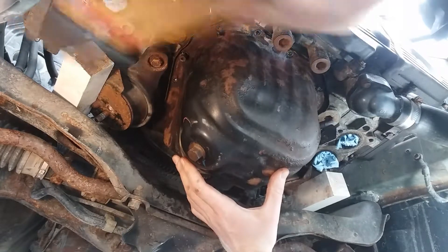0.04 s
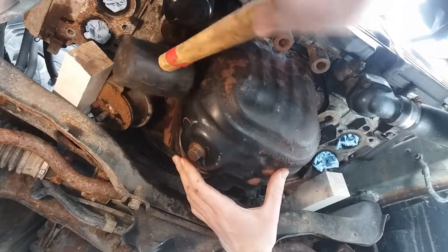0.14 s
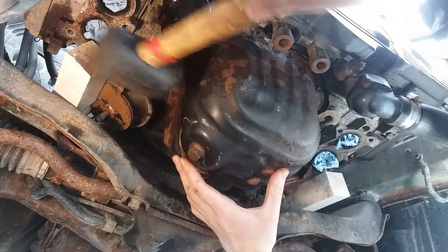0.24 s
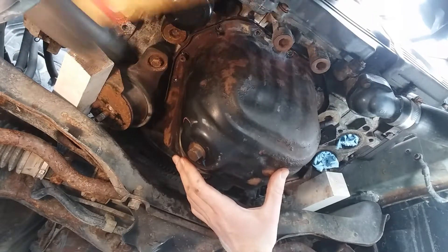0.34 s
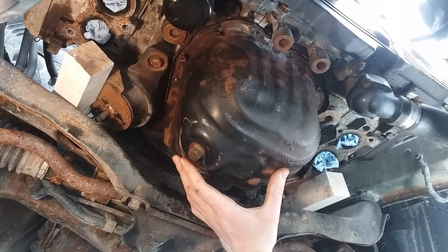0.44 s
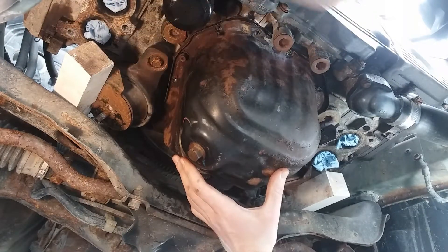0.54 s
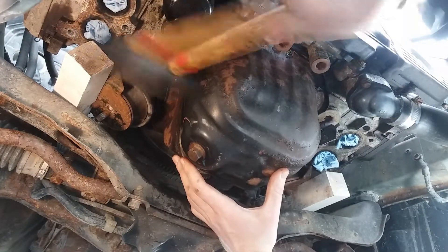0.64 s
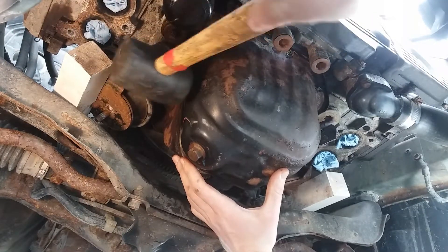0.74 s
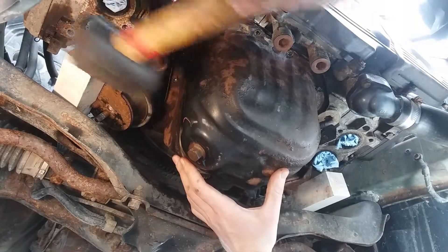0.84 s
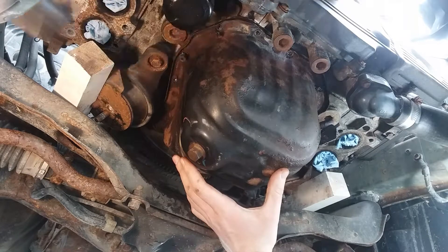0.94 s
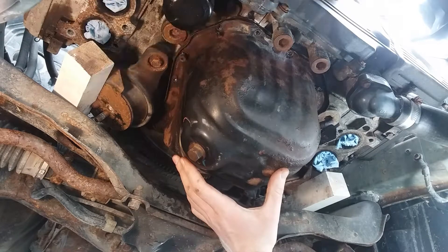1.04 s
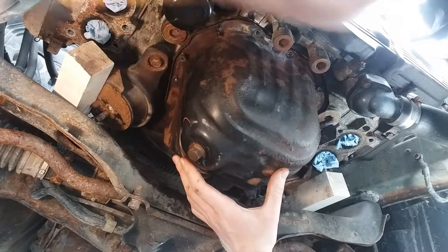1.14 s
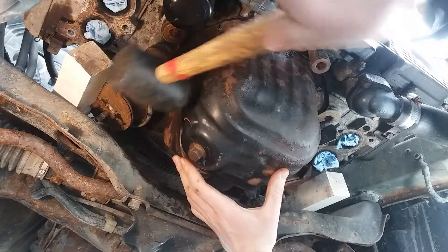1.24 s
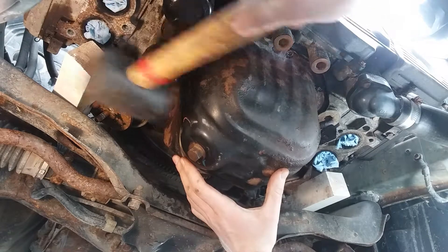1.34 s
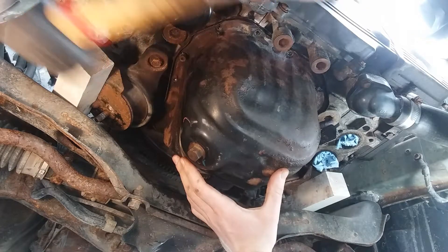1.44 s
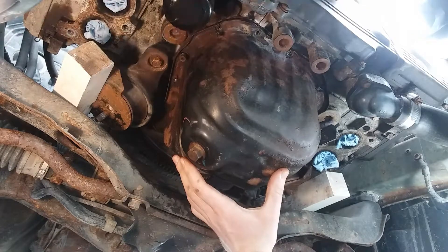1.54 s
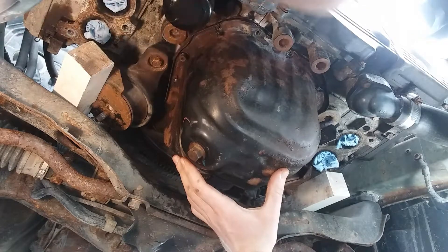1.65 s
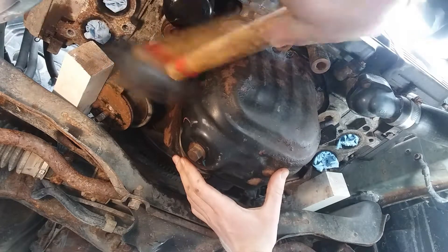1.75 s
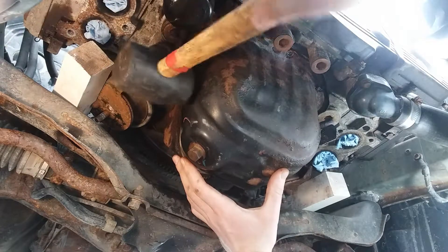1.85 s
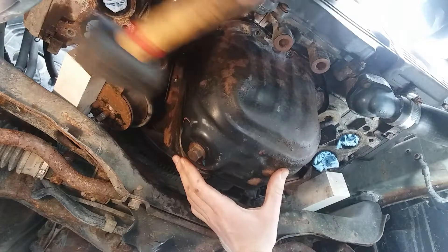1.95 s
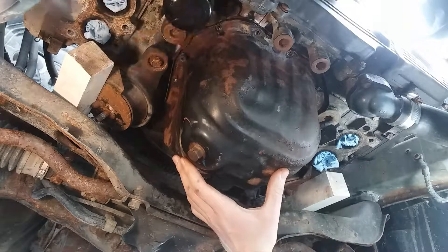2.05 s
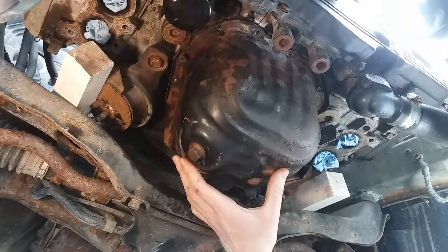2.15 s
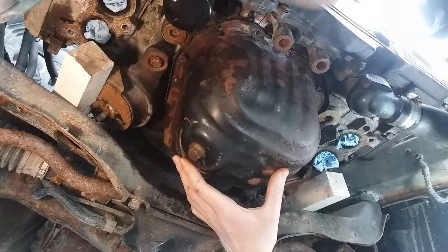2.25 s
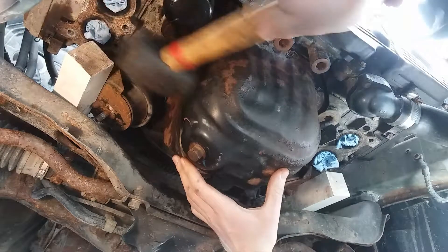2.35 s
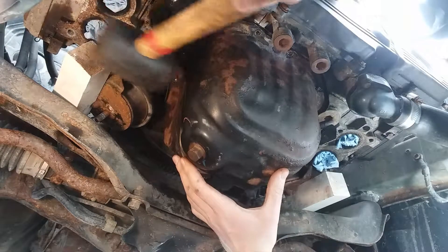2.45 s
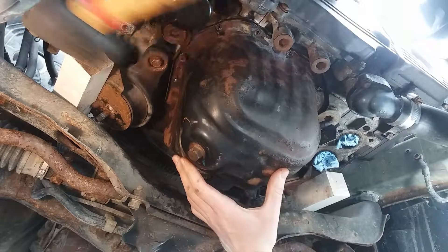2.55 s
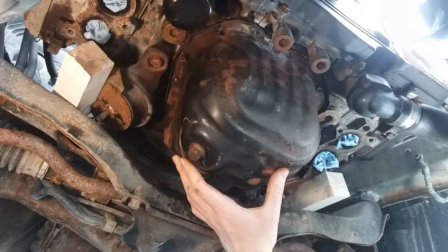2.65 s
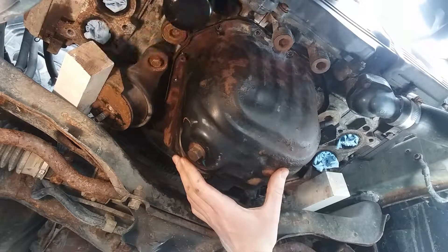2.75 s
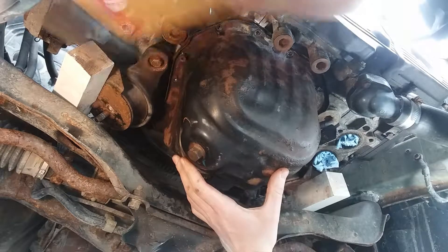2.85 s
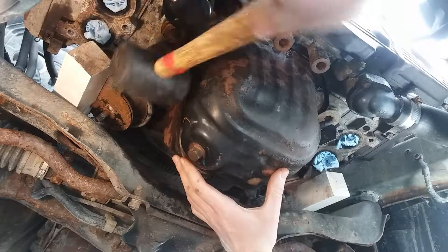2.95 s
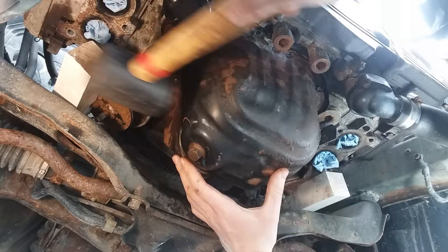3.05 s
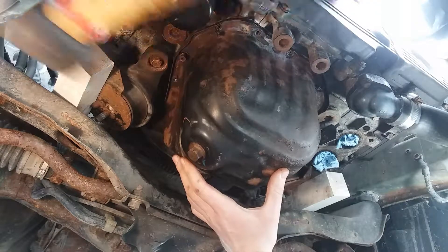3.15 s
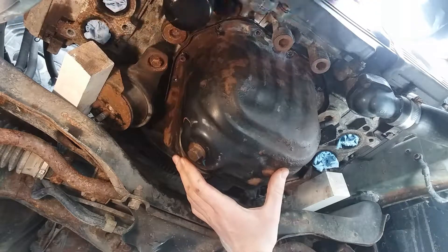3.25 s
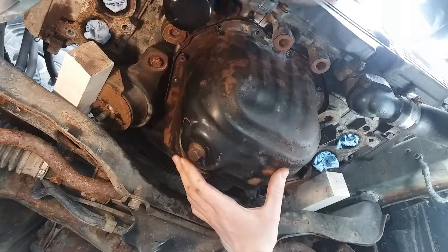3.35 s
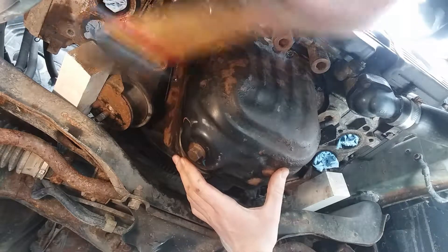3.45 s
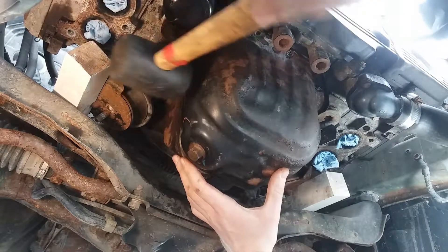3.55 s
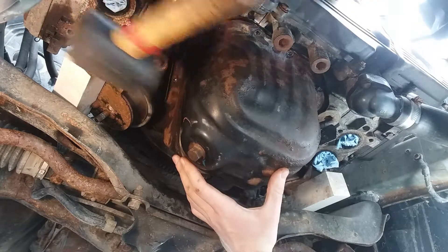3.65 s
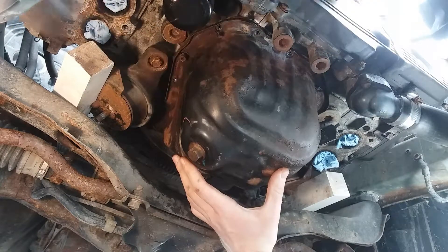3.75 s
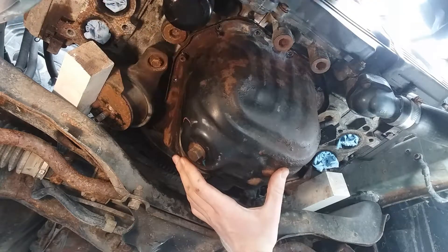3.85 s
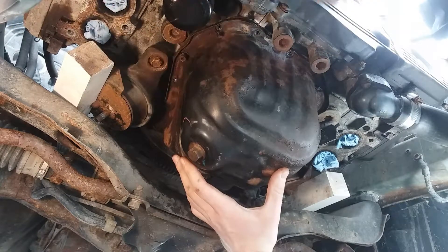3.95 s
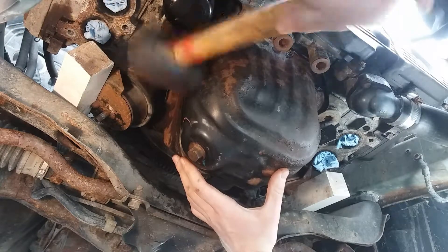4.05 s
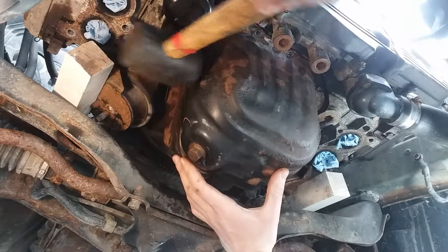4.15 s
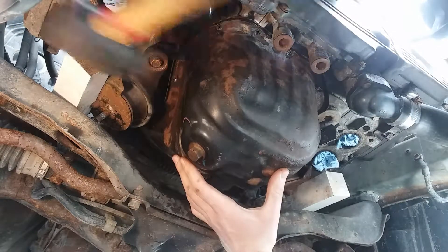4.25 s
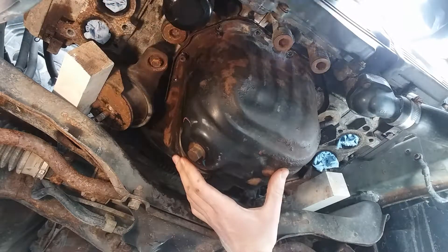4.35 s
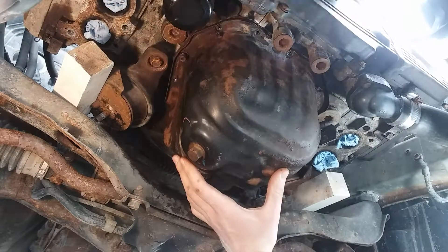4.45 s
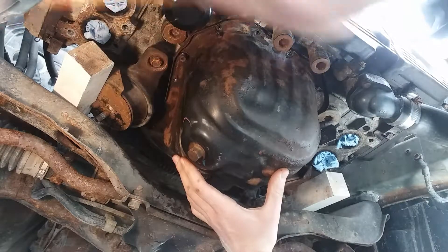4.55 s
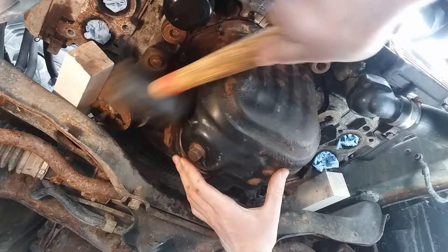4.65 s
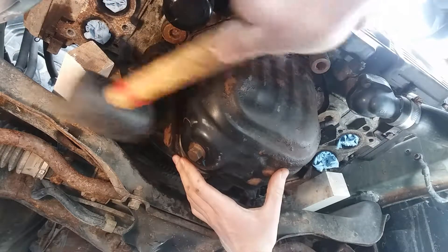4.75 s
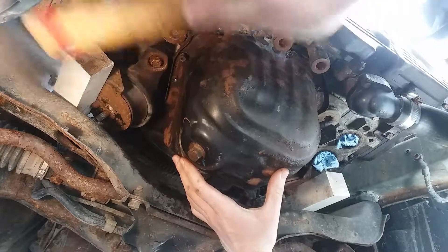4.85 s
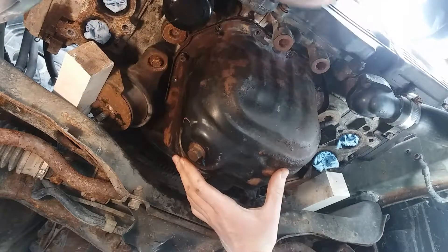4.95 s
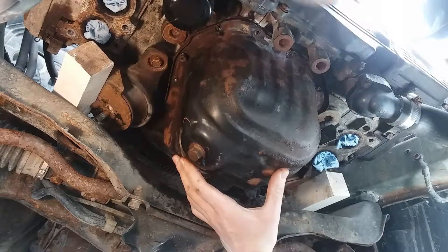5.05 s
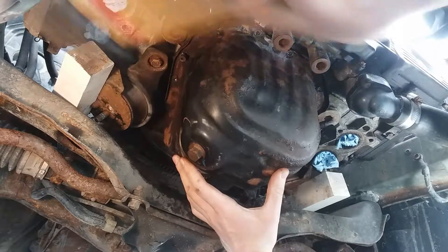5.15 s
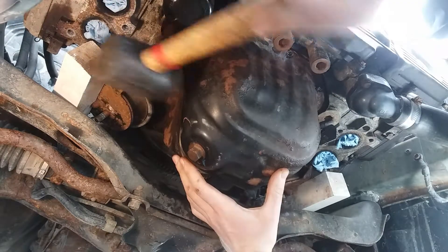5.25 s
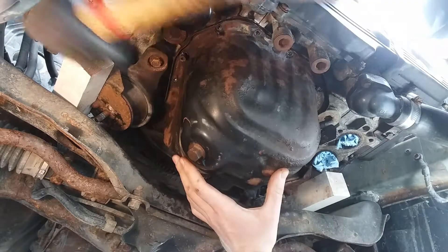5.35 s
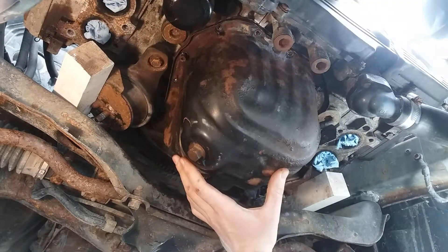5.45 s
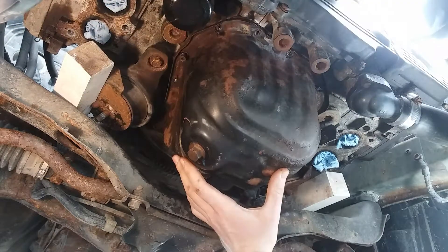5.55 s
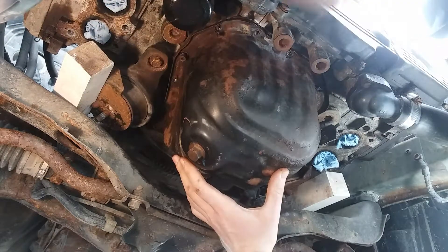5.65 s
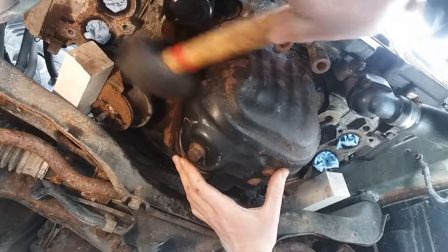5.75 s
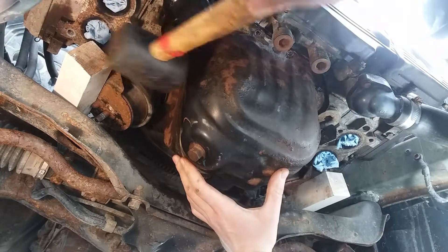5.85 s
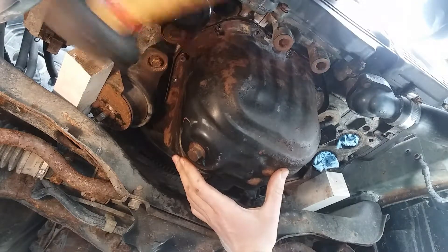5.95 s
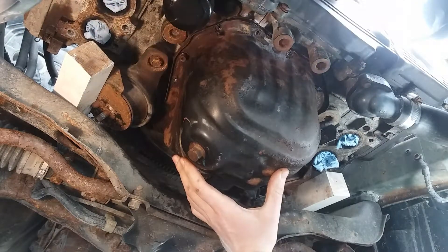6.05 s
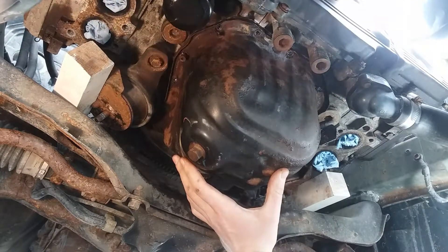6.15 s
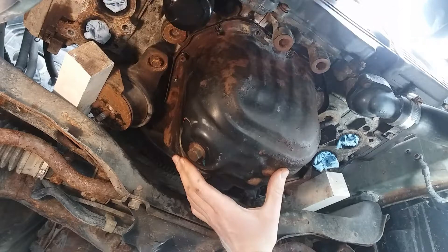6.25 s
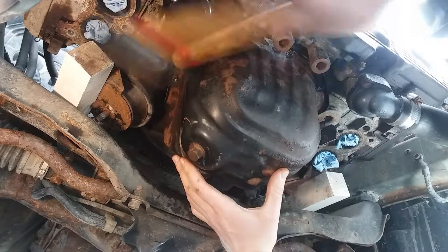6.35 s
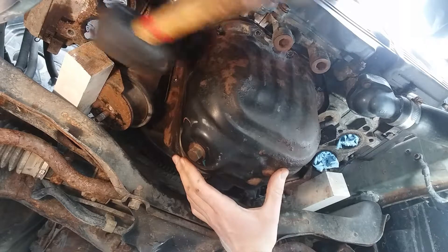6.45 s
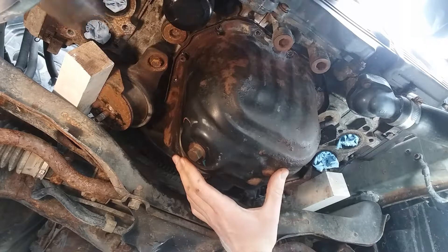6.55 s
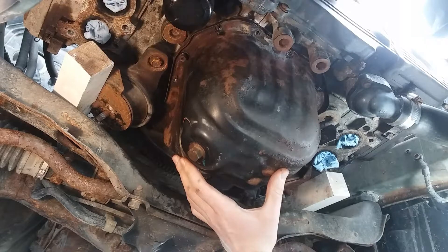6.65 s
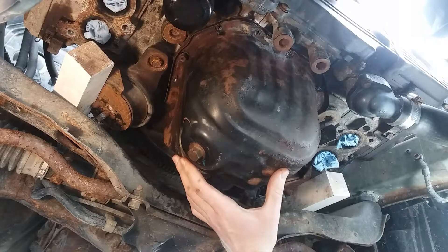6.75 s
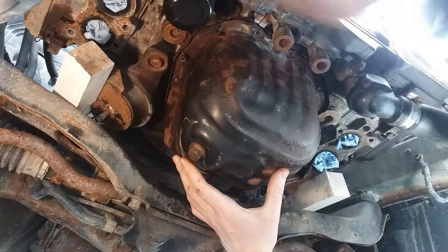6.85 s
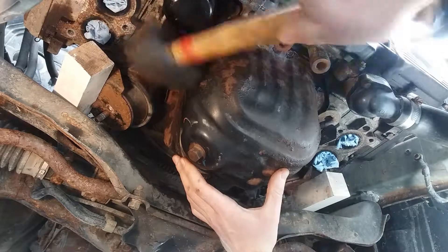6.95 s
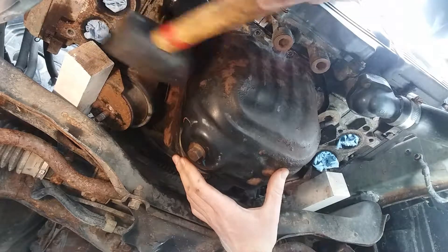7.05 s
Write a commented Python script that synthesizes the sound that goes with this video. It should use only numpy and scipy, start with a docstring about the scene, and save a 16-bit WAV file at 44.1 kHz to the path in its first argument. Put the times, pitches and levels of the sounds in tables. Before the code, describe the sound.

Under a car in a home garage, a rubber mallet strikes a steel oil pan thirteen times, a little under two blows a second. Each is a loud, hollow, mid-pitched clonk with dry rusty clatter and tight reflections, gone quickly. Between blows there are very faint sleeve rustles, small ticks and a little low air buffeting. The close stereo microphone hears almost no room tail.

```python
"""Rubber mallet on an oil pan

Under a car in a home garage a rubber mallet knocks thirteen times on a steel oil pan, steadied by a hand.
Each knock is a set of fading sine tones, hollow near 700 Hz, with echoes from floor and underbody;
bands of noise add the rusty clatter. Shaped noise also makes the sleeve's rustle, light ticks and scuffs
of handling, a dull puff, air buffeting the close microphone, and a hiss and a broad rush that swell at
the end. A limiter holds down the highest peaks."""
import sys
import numpy as np
from scipy import signal
from scipy.io import wavfile
from scipy.ndimage import uniform_filter1d, minimum_filter1d

SR = 44100
rng = np.random.default_rng(int(sys.argv[2]) if len(sys.argv) > 2 else 0)


def log_audio(samples):
    """Write samples as a 16-bit WAV file to the path given in sys.argv[1]."""
    # one column per channel
    frames = np.atleast_2d(samples).T
    # limit to full scale, then quantise
    limited = np.clip(frames, -1, 1)
    pcm = np.round(limited * 32767).astype(np.int16)
    wavfile.write(sys.argv[1], SR, pcm)


N = 313110
TIME = np.arange(N) / SR  # the whole scene [s]
AGE = np.arange(int(.45 * SR)) / SR  # time since one short sound began [s]
EDGES = 25 * 2 ** (np.arange(25) * .39)  # edges of the noise bands [Hz]


def from_db(db):
    """Turn decibels into a gain."""
    return 10 ** (np.asarray(db) / 20)


def rms_one(x):
    """Scale a sound to an average power of 1."""
    return x / np.sqrt(np.mean(x ** 2) + 1e-20)


def in_time(rows):
    """Draw straight lines through (time, level) points, giving a level at every sample."""
    times, levels = np.transpose(rows)
    return np.interp(TIME, times, levels)


def at_hz(rows, hz):
    """Read every column of a spectrum table at one frequency, spacing pitches as the ear does."""
    table_hz, *columns = np.transpose(rows)
    return [np.interp(np.log(hz), np.log(table_hz), column) for column in columns]


def pan(db):
    """Left and right gains that make the left side louder than the right by this many dB."""
    return from_db(np.array([[db], [-db]]) / 2)


def dying(t60, rise_s):
    """Loudness shape that builds up quickly, then fades at 60 dB per t60 seconds."""
    return np.exp(-np.log(1000) * AGE / t60) * (1 - np.exp(-AGE / rise_s))


def add(out, start_s, sound):
    """Mix a sound in at a given time."""
    start = int(start_s * SR)
    out[:, start:start + sound.shape[-1]] += sound[:, :N - start]


def drift(per_s):
    """Slow random wander: random points joined by lines, with a spread of 1."""
    knots = np.arange(0, N / SR + 1, 1 / per_s)
    return rms_one(np.interp(TIME, knots, rng.standard_normal(len(knots))))


def swells(rows):
    """Gain of short bell-shaped swells, added together."""
    return sum(from_db(db) * np.exp(-.5 * ((TIME - s) / length) ** 2) for s, db, length in rows)


# how alike the left and right noise are: (frequency [Hz], correlation [-1 to 1])
LIKENESS = [(60, 0.1), (150, 0.87), (300, 0.61), (700, 0), (1400, 0), (4000, 0.0022), (12000, 0.085)]


def noise_bands(shape):
    """Yield (centre Hz, band of stereo noise), mixing a shared and an opposed noise for the likeness."""
    white = rng.standard_normal((2, 2) + shape)
    for k, (low, high) in enumerate(zip(EDGES, EDGES[1:])):
        hz = np.sqrt(low * high)
        band = signal.butter(2, [low, high], "band", fs=SR, output="sos")
        mid, side = signal.sosfilt(band, white[k % 2])  # neighbouring bands use different noise
        alike = np.clip(at_hz(LIKENESS, hz)[0], -1, 1)
        mid = np.sqrt(1 + alike) * mid
        side = np.sqrt(1 - alike) * side
        yield hz, np.stack([mid + side, mid - side], axis=-2)


# draught on the microphone, relative: (time [s], level [dB])
RUMBLE = [(0.01, -49.5), (2.81, -58), (3.77, -53.5), (3.95, -45), (4.33, -51), (4.69, -36), (5.01, -33),
          (5.09, -42.0), (5.53, -40.5), (5.77, -50.5), (6.23, -69.5), (6.93, -53.5)]
# its strongest gusts: (time [s], level [dB], length [s])
GUSTS = [(4.612, -33.5, 0.012), (4.72, -40, 0.032), (4.845, -29.5, 0.018), (4.98, -41.5, 0.026),
         (5.553, -44, 0.0053)]


def draught(rumble, gust):
    """Moving air buffets the microphone: a lumpy low rumble with short stronger gusts."""
    lumps = from_db(2.2 * drift(per_s=35))
    return rumble * from_db(in_time(RUMBLE) - 2.6) * lumps + gust * swells(GUSTS)


# soft background rush, relative: (time [s], level [dB])
RUSH = [(0.01, -56.5), (0.97, -50.5), (1.19, -55), (2.91, -66.5), (3.21, -56.5), (3.29, -62.5),
        (5.25, -58.5), (5.57, -55), (5.71, -58.5), (5.79, -48.5), (6.27, -60.5), (6.82, -43)]


def soft_rush(rush):
    """A broad noise follows a slow level curve and swells at the end."""
    return rush * from_db(in_time(RUSH) - 1.92)


# hiss above the rush, relative: (time [s], level [dB])
HISS = [(0.01, -71), (1.27, -65), (2.31, -75), (2.39, -66), (2.85, -81.5), (3.51, -57.5), (3.85, -69),
        (4.43, -68), (4.69, -61.5), (5.25, -67), (5.67, -61.5), (5.79, -62.5), (6.37, -69), (6.82, -47.0)]


def soft_hiss(hiss, grain):
    """A grainy high noise follows its own level curve."""
    return hiss * from_db(in_time(HISS) - 4.1) * grain


def strokes():
    """Gain of the sleeve: one swell on the swing before a blow and a softer one on the lift after it."""
    swing_lead_s, swing_s = 0.078, 0.063
    lift_lag_s, lift_s, lift_db = 0.23, 0.076, -1.5
    swings = [(s - swing_lead_s, db, swing_s) for s, *_, db in BLOWS]
    lifts = [(s + lift_lag_s, db + lift_db, lift_s) for s, *_, db in BLOWS]
    return swells(swings + lifts)


def sleeve_rustle(hiss, rustle, grain):
    """Cloth catches and slips as the arm moves, so the high noise flutters."""
    motion = strokes() * from_db(2.8 * drift(per_s=59))
    return (from_db(-5.5) * hiss + rustle * pan(db=10.0)) * motion * grain


# the steadying hand scuffs on the steel, relative: (time [s], level [dB], length [s])
SCUFFS = [(0.615, -63.5, 0.06), (4.555, -57, 0.023)]


def hand_scuffs(hiss, rush, grain):
    """Skin rubbing on steel: brief swells of hiss and rush."""
    return (hiss + from_db(-2.5) * rush) * grain * swells(SCUFFS)


# spectra of the five noises, relative: (frequency [Hz], level per Hz [dB])
RUMBLE_COLOUR = [(15, -55), (25, -28), (61, -3.5), (107, 3), (152, 2.5), (261, -8.5), (361, -19.5),
                 (500, -20.5), (650, -52.5), (1100, -120)]
GUST_COLOUR = [(15, -50), (25, -41), (59, 1.5), (173, -2.5), (285, 3), (408, -10), (446, -7.5), (661, -22),
               (1800, -44), (2340, -67.5), (3960, -120)]
RUSH_COLOUR = [(150, -26), (250, 0), (454, -0.5), (558, 4), (1150, -4), (1530, -8.5), (2600, -25.5),
               (3380, -51.5), (5720, -120)]
HISS_COLOUR = [(1000, -30), (1700, -1), (2360, -6), (2820, -2), (4380, -4.5), (6150, -18.5), (9370, -31.5),
               (12500, -22.5), (16000, -38.5)]
RUSTLE_COLOUR = [(3000, -6), (7000, 0.5), (9500, -8), (12500, 4.5), (16000, -1)]


def air():
    """Colour one noise in five ways, then play draught, rush, hiss, sleeve and scuffs with it."""
    colours = [RUMBLE_COLOUR, GUST_COLOUR, RUSH_COLOUR, HISS_COLOUR, RUSTLE_COLOUR]
    layers = np.zeros((len(colours), 2, N))
    for hz, noise in noise_bands((N,)):
        for layer, colour in zip(layers, colours):
            if colour[0][0] <= hz <= colour[-1][0]:
                layer += from_db(at_hz(colour, hz)[0]) * noise
    rumble, gust, rush, hiss, rustle = map(rms_one, layers)
    grain = from_db(0.87 * drift(per_s=16) + 1.3 * drift(per_s=200))
    background = draught(rumble, gust) + soft_rush(rush) + soft_hiss(hiss, grain)
    return background + sleeve_rustle(hiss, rustle, grain) + hand_scuffs(hiss, rush, grain)


def ring(modes, rise_s, left_lead_s, scatter_db, detune):
    """One blow on a set of modes; each landing spot shares the force out a little differently."""
    out = 0
    pitch = 1 + detune * rng.standard_normal()
    for hz, db, t60, side_db in modes:
        wave = np.sin(2 * np.pi * hz * pitch * (AGE + np.array([[left_lead_s], [0]])))
        gain = from_db(db + scatter_db * rng.standard_normal())
        out = out + gain * pan(side_db) * wave * dying(t60, rise_s)
    return out


# dense clatter of sheet and rust, relative: (frequency [Hz], level per Hz [dB], left over right [dB])
CLATTER = [(40, -22, 5.5), (85, -1, 0.5), (170, -3, -0.5), (350, -5, -4.5), (700, -4.5, -1.5),
           (1030, -10, 7.5), (1590, -4, 2.5), (2800, -8.5, -2), (4180, -9.5, -5), (5180, -14, 3),
           (7150, -20, 11.5), (8900, -35, 11.5), (13200, -17.5, 10.5), (17300, -25.5, 14)]
# how long the clatter lasts: (frequency [Hz], time to fade by 60 dB [s])
CLATTER_T60 = [(100, .16), (350, .11), (1000, .125), (2500, .11), (5000, .097), (9000, .08), (16000, .072)]


def clatter(level_db, fresh, hold_s, rise_s, room_db, room_t60):
    """Countless close modes, partly the same at each blow; they rattle while the rubber presses, then die."""
    _, _, clatter_db, thud_db, _ = np.transpose(BLOWS)[:, :, None, None]
    tilt_db_per_octave = -1.73
    out = 0
    for hz, noise in noise_bands((len(BLOWS) + 1, len(AGE) * 3 // 2)):
        noise = noise[..., -len(AGE):]  # skip the start, where the filters are still settling
        db, side_db = at_hz(CLATTER, hz)
        t60, = at_hz(CLATTER_T60, hz)
        # the first noise is common to all blows, the others are new for each blow
        grain = np.sqrt(1 - fresh) * noise[0] + np.sqrt(fresh) * noise[1:]
        colour_db = thud_db if hz < 250 else clatter_db + tilt_db_per_octave * np.log2(hz / 1000)
        fade = np.exp(-np.log(1000) * np.maximum(AGE - hold_s, 0) / t60)
        envelope = fade * (1 - np.exp(-AGE / rise_s))
        garage_tail = from_db(room_db) * dying(room_t60, rise_s=.02) / (1 + hz / 4000)  # faint and dull
        gain = from_db(level_db + db + colour_db) * pan(side_db)
        out = out + gain * grain * (envelope + garage_tail)
    return out


# mallet blows, relative levels:
# (time [s], force [dB], clatter [dB], low thud [dB], sleeve rustle [dB])
BLOWS = [(0.1816, 0, 2, -1, -100), (0.7521, 0.5, 2.5, -1.5, -72), (1.3138, 0.5, 3, 0, -78),
         (1.85, -.5, 3, 2.5, -74.5), (2.4363, 0, 3, -3, -87.5), (2.9912, 0, 1.5, -1, -89.5),
         (3.574, -1, 2.5, 0, -78), (4.1469, -1, 1, 3.5, -72), (4.7304, -1, 3.5, 1, -72.5),
         (5.2928, -.5, 3, 1, -77.5), (5.846, 0.5, 0, -5, -68.5), (6.4336, -0.5, -1, -15.5, -79.5),
         (6.9819, 2.5, -0.5, -10, -100)]
# hollow modes of the pan's belly, relative:
# (frequency [Hz], level [dB], time to fade by 60 dB [s], left over right [dB])
BELLY = [(496, -29, .18, -5), (539.4, -11.3, .124, -2), (583, -16, .065, -.6), (675, -20, .086, -.5),
         (693, -7.2, .18, 1), (729.7, -2, .042, -.7), (764, -16, .12, -6), (822.6, -33, .17, 2)]
# modes of its walls and flange, relative:
# (frequency [Hz], level [dB], time to fade by 60 dB [s], left over right [dB])
WALLS = [(70, -40, .14, 6), (118, -35, .2, -2), (150, -37, .2, 1), (207, -30, .09, 0), (288, -21, .08, -4),
         (326, -27, .1, -3), (374, -21, .08, -1), (420, -27, .06, -2), (932, -25, .11, 0),
         (1092, -32, .1, 3), (1125, -32, .1, 4), (1213, -24, .15, 4), (1325, -27, .1, 1),
         (1366, -23, .12, -3), (1504, -24, .13, -1), (1562, -28, .15, 0), (1700, -29, .1, 7),
         (1771, -26, .13, -6), (1803, -28, .1, -2), (1921, -28, .14, -3), (2271, -24.5, .13, 6),
         (2315, -29, .11, -2), (2490, -30, .09, -1), (2750, -27, .09, -6), (2893, -31, .1, -5),
         (3060, -32, .09, -7), (3383, -32, .09, -5), (3917, -30, .09, 0), (4067, -30, .07, -2),
         (4225, -29, .07, -10)]
# reflections from floor and underbody: (delay [s], strength [gain])
ECHOES = [(.00675, .9), (.01582, .58), (.01783, .22), (.02791, .72)]


def knocks():
    """The mallet sets the pan moving: belly tone with its reflections, wall modes and clatter."""
    belly_lag_s = .0013  # the belly starts to swing just after the rubber first touches
    tone, steel = np.zeros((2, 2, N))
    rattles = clatter(level_db=-4.5, fresh=0.77, hold_s=0.0099, rise_s=0.0016, room_db=-33.0, room_t60=0.42)
    for (s, force_db, *_), rattle in zip(BLOWS, rattles):
        # soft rubber needs a few milliseconds to set the steel moving
        belly = ring(BELLY, rise_s=.0032, left_lead_s=.00027, scatter_db=.5, detune=.001)
        walls = ring(WALLS, rise_s=.0035, left_lead_s=.00006, scatter_db=1.2, detune=.001)
        for delay, strength in [(0, 0.94)] + ECHOES:  # the direct sound comes first
            add(tone, s + belly_lag_s + delay, from_db(force_db) * strength * belly)
        add(steel, s, from_db(force_db) * (walls + rattle))
    return from_db(0.1) * tone + steel


def faint_ticks(count):
    """Rows (time [s], level [dB]) of tiny contacts at random moments while the grip shifts."""
    from_s, to_s = 4.45, 6.05
    middle_db, spread_db = -50, 2.5
    when, size = rng.random((count, 2)).T
    return list(zip(from_s + when * (to_s - from_s), middle_db + spread_db * (2 * size - 1)))


# the clearest ticks of handling, relative: (time [s], level [dB])
TICKS = [(0.659, -28), (1.1129, -48), (4.3833, -36), (5.2, -49), (5.7206, -44.5), (5.9483, -48),
         (6.0414, -50)]


def ticks(low_hz, high_hz, snap_t60, snap_db, ring_t60, ring_db):
    """Light dry contacts between the blows: a bright snap of noise and a brief metallic ring."""
    out = np.zeros((2, N))
    band = signal.butter(2, [low_hz, high_hz], "band", fs=SR, output="sos")
    for s, db in TICKS + faint_ticks(count=8):
        white = rng.standard_normal((2, len(AGE)))
        snap = from_db(snap_db) * white * dying(snap_t60, rise_s=0.000076)
        metal = rms_one(signal.sosfilt(band, white))
        tail = from_db(ring_db) * metal * dying(ring_t60, rise_s=0.0012)
        add(out, s, from_db(db) * (snap + tail))
    return out


def bump(s, level_db, top_hz, t60):
    """A dull puff on the microphone: low noise that starts fast and fades."""
    band = signal.butter(2, [90, top_hz], "band", fs=SR, output="sos")
    puff = rms_one(signal.sosfilt(band, rng.standard_normal((2, len(AGE)))))
    out = np.zeros((2, N))
    add(out, s, from_db(level_db) * puff * dying(t60, rise_s=.001))
    return out


def scene():
    """Add up air and sleeve, knocks, handling ticks and one bump."""
    handling = ticks(low_hz=1920, high_hz=4530, snap_t60=0.022, snap_db=-3.0, ring_t60=0.021, ring_db=-4.5)
    puff = bump(s=4.83, level_db=-27.5, top_hz=620, t60=0.14)
    return air() + knocks() + handling + puff


def limiter(x, ceiling_db, release_db_per_s):
    """Peaks above the ceiling pull the gain down at once; it recovers steadily."""
    level_db = 20 * np.log10(np.abs(x).max(axis=0) + 1e-9)
    over = np.maximum(level_db - ceiling_db, 0)
    ramp = release_db_per_s * TIME
    cut = np.maximum.accumulate(over + ramp) - ramp
    # widen each cut by about 1 ms either way, then round its corners
    return x * from_db(uniform_filter1d(minimum_filter1d(-cut, size=89), size=89))


def record(dry):
    """Limit the highest peaks, then cut everything above 16 kHz steeply."""
    held = limiter(dry, ceiling_db=-.8, release_db_per_s=700)
    return signal.sosfilt(signal.ellip(10, .1, 80, 16000, fs=SR, output="sos"), held)


dry = scene()
out = record(dry)
log_audio(out)
```